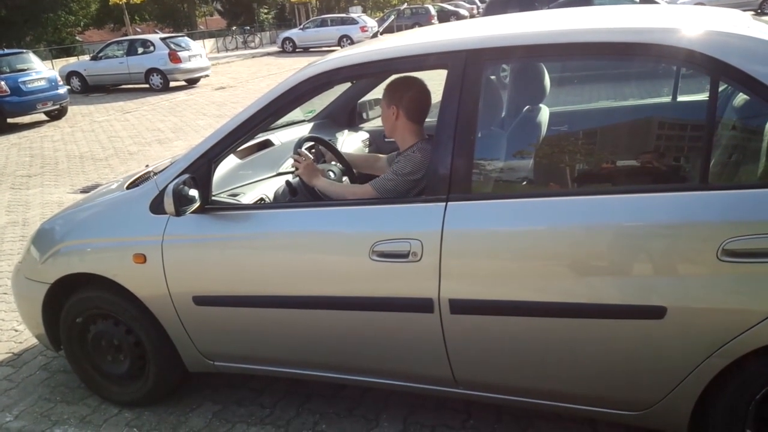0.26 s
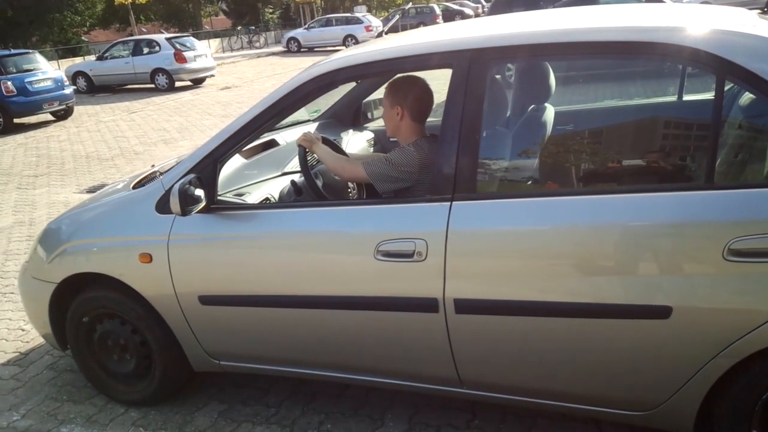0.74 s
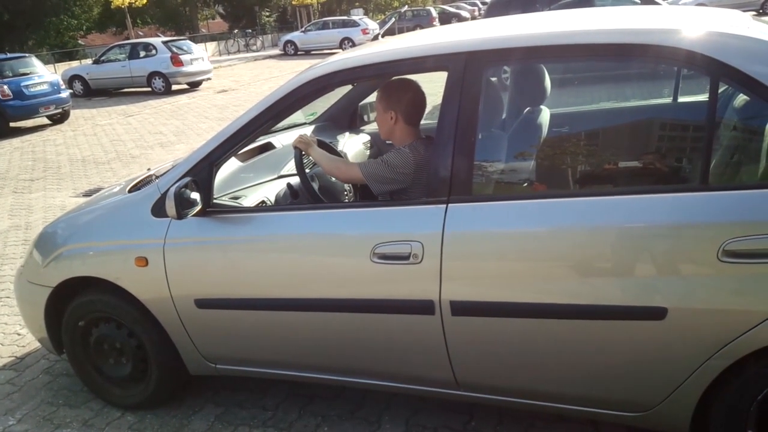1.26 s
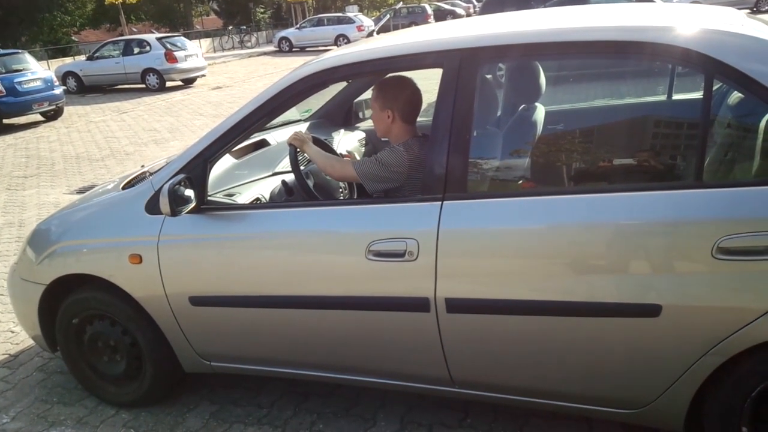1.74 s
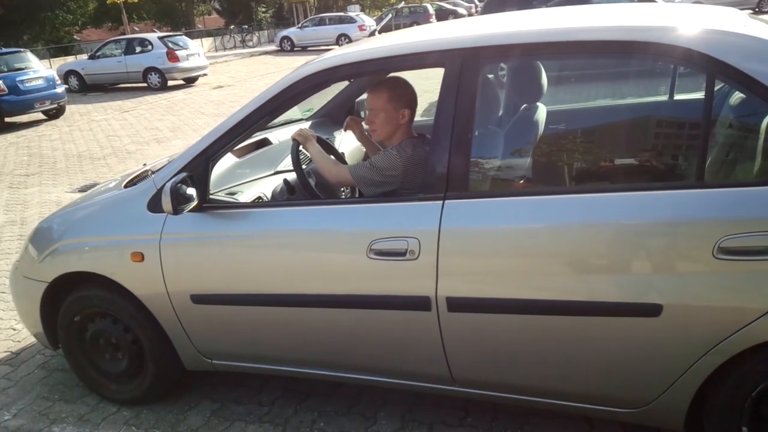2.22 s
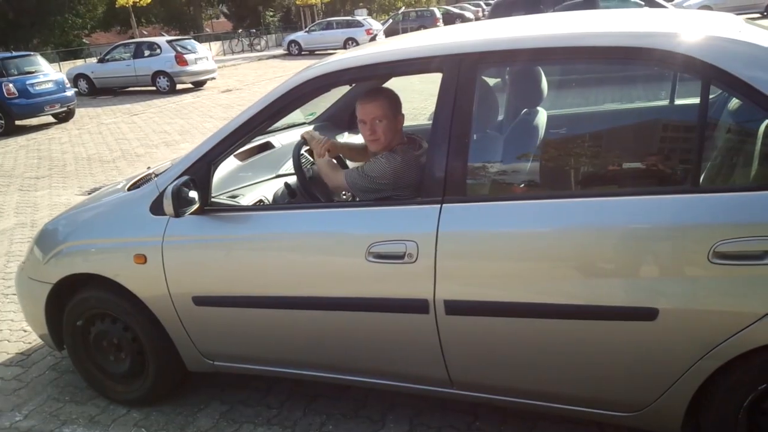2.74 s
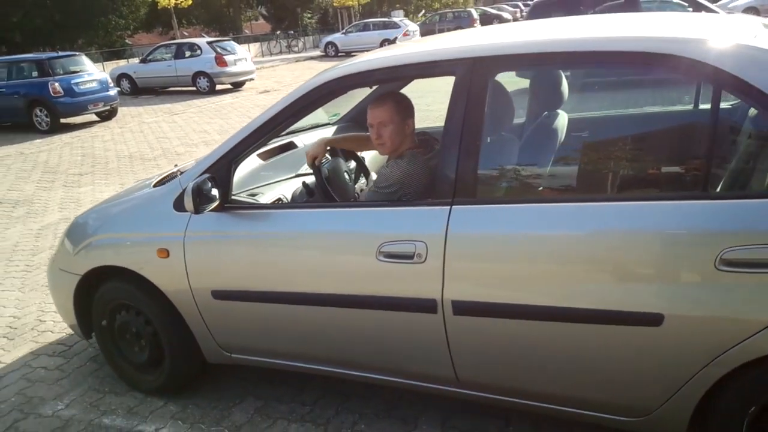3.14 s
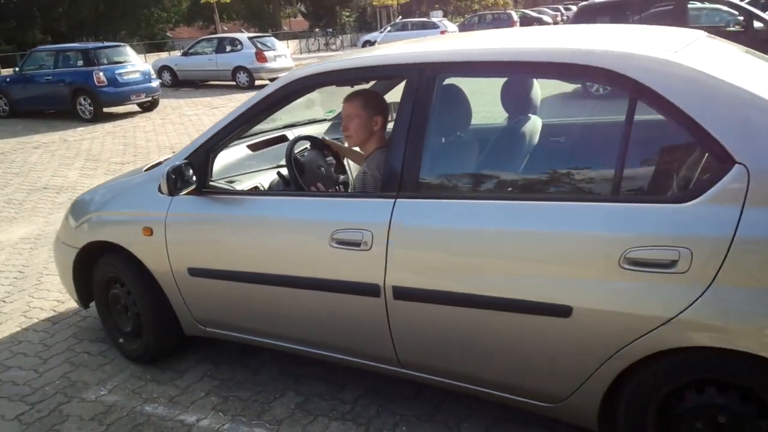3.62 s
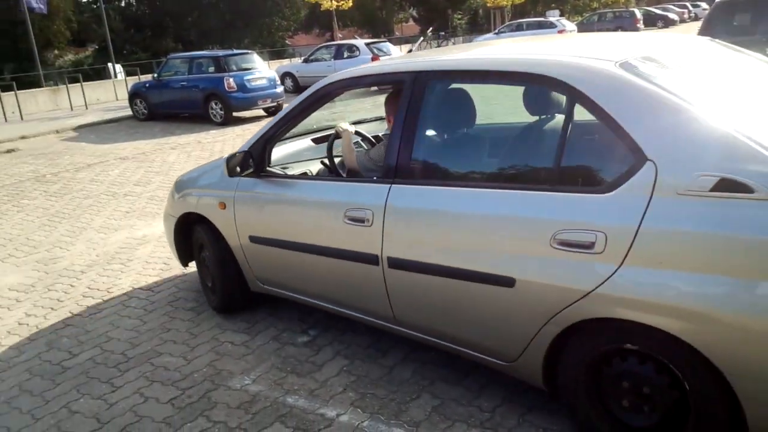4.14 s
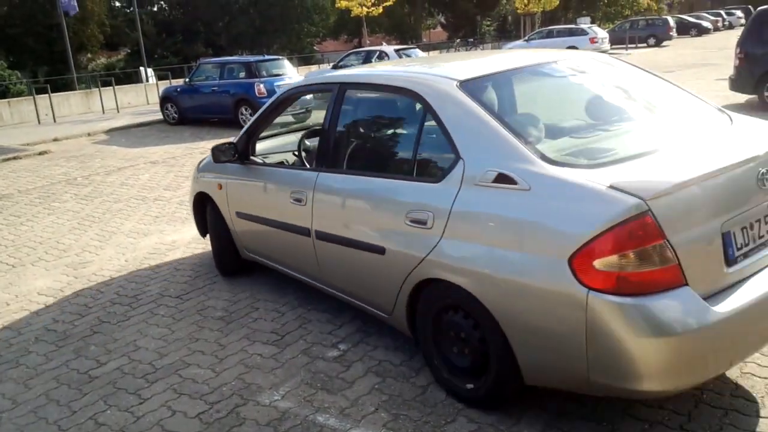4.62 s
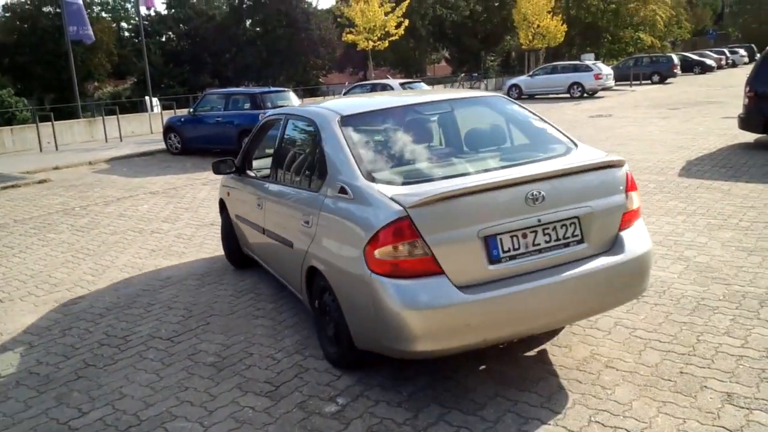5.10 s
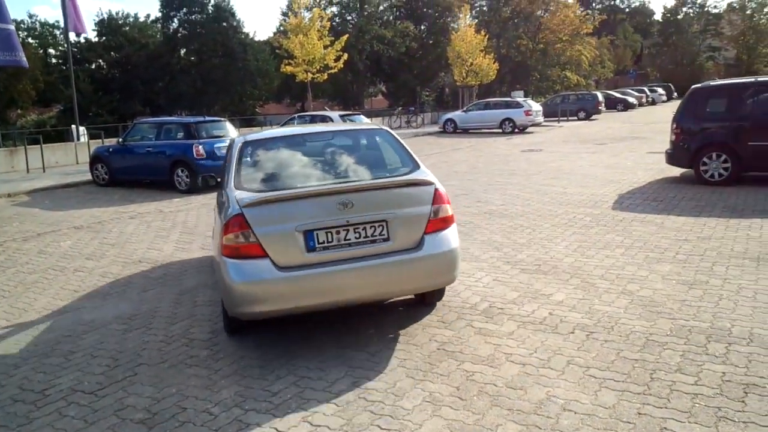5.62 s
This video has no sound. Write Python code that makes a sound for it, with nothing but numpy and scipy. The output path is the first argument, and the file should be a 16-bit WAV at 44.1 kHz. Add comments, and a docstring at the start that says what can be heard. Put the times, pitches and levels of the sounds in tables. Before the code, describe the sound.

A hybrid car clunks, whines faintly and creeps away, its tyres rumbling over paving stones and snapping grit.

```python
"""A paved car park, one microphone a couple of metres from a hybrid car that stands, then creeps off on
its electric motor. Levers and pedals clunk through the open window, the body rocks on its springs and
the inverter starts to whine. The tyres rumble over the paving stones and crush grit, which now and then
snaps. Distant traffic and leaves lie behind it all, and a light breeze touches the microphone."""
import sys
import numpy as np
from scipy import signal
from scipy.fft import rfft, irfft
from scipy.io import wavfile

SR = 44100
rng = np.random.default_rng(int(sys.argv[2]) if len(sys.argv) > 2 else 0)


def digitize_waveform(pressure):
    """Quantize a signal to 16-bit integers and store it at the path in sys.argv[1].

    Rows of a 2-D input are taken as channels; values are limited to [-1, 1].
    """
    field = np.atleast_2d(pressure).T
    bounded = np.clip(field, -1, 1)
    quanta = np.round(bounded * 32767).astype(np.int16)
    wavfile.write(sys.argv[1], SR, quanta)


N = 258426

# Tone colours as they reach the microphone. Each row: frequency in Hz, relative level in dB.
TOWN_SPECTRUM = [(30, 6.5), (100, 6), (200, 5), (320, 2.5), (500, -3), (1100, -4), (2000, -11), (3000, -13),
                 (4200, -15), (6300, -10.5), (8500, -18), (11000, -19), (14000, -19.5)]  # far traffic and leaves
RATTLE_SPECTRUM = [(2000, -28), (3000, -24.5), (3800, -9.5), (4700, -11.5), (5200, -4), (5900, -1),
                   (6550, -1), (8000, -4.5), (9500, -13), (11000, -28), (12700, -30), (13200, -12.5),
                   (13800, -31)]  # loose linkage
KNOCK_SPECTRUM = [(450, -11.5), (730, -3), (1100, -7), (1500, -1.5), (2150, -2), (2900, -11), (4500, -7)]  # a blow on a panel or the ground
THUD_SPECTRUM = [(40, -23), (120, 6.5), (220, -3.5), (350, -3), (460, -10), (700, -37.5)]  # the car's shell
CRUNCH_SPECTRUM = [(1500, -18), (2850, -17), (3600, -8), (4500, -4), (5000, -3.5), (5900, -1), (6600, 2),
                   (7400, -5.5), (9000, -14.5), (10900, -27), (12200, -29), (13400, -19.5), (14000, -47)]  # crushed grit
ROAR_SPECTRUM = [(350, -34), (490, -8.5), (680, -0.5), (1020, 0.5), (1250, -2.5), (1750, 3), (2200, -3),
                 (2850, -15), (4500, -42)]  # tread on paving
BOOM_SPECTRUM = [(30, -5), (55, 7), (90, 4), (155, 0.5), (205, 0.5), (260, 3), (320, 0), (375, -11.5),
                 (490, -27), (800, -21.5)]  # tyre carcass
CRACK_SPECTRUM = [(900, -49), (2800, -30.5), (4000, 8.5), (6500, 12.5), (8500, 3.5), (11000, 8.5),
                  (13500, -12), (15000, -70)]  # a stone giving way
# Breeze on the microphone. Each row: time in seconds, level in dB.
BREEZE_LEVELS = [(0, -51.5), (.6, -48), (1.6, -45), (2.8, -49.5), (4.3, -44.5), (5.86, -47.5)]
# Steel levers and their catches. Each row: start in seconds, rattle level in dB, body level in dB.
LEVER_PULLS = [(.189, -39.5, -40), (.246, -42, -46.5), (.701, -39, -51), (.713, -46, -47),
               (1.180, -12, -29), (1.232, -40, -35.5), (1.260, -26, -35.5), (1.382, -26.5, -32)]
# Dull knocks from the car, and three short tyre scrunches as it starts to roll (2.798 to 2.941 s).
# Each row: start in seconds, rattle level in dB, body level in dB, centre pitch in Hz.
KNOCKS_AND_SCRUNCHES = [(1.534, -42.5, -31, 830), (1.589, -39, -34, 990), (1.635, -43, -38.5, 2230),
                        (1.714, -52, -44, 1200), (2.631, -45, -45.5, 1400), (2.798, -50, -44, 1900),
                        (2.852, -48, -41, 1880), (2.941, -51, -40.5, 1900), (3.001, -38, -41, 1900),
                        (3.072, -34.5, -33.5, 2060), (3.120, -45, -34.5, 1400), (3.206, -33.5, -24.5, 1950),
                        (3.243, -55, -39.5, 790), (3.345, -35, -37.5, 1370), (3.403, -31.5, -32, 1430)]
# How panels and steel linkage ring. Each row: frequency in Hz, seconds to fall 60 dB, level in dB.
PANEL_MODES = [(737, 0.14, 6), (836, 0.087, 0), (1328, 0.028, 1), (1560, 0.028, -25), (1956, 0.13, -8.5),
               (2192, 0.15, -7)]
LINKAGE_MODES = [(5250, 0.099, 1), (6070, 0.017, 11.5), (6430, 0.038, 8), (6770, 0.061, -25),
                 (8500, 0.035, -27), (8200, 0.054, -2), (8240, .06, -12.5), (9700, 0.033, -11)]
# The car gathers pace. Each row: time in seconds, share of the final speed.
SPEED_CURVE = [(1.2, 0.0087), (1.65, 0.033), (2.65, 0.03), (3.0, 0.21), (3.65, .35), (4.0, .51),
               (4.45, 0.89), (5.101, 1.0)]
# Steered tyres grind sand on the spot. Each row: middle in seconds, half length in seconds, level in dB.
STEERING_SCRUBS = [(0.497, 0.32, -58), (3.193, 0.23, -44.5)]
# The body rocks on its springs. Each row: start in seconds, peak in dB, frequency in Hz.
BODY_THUMPS = [(1.222, -26, 58), (1.427, -27, 41.7), (1.684, -25.5, 52)]
# The inverter's switching tone. Each row: time in seconds, level in dB.
WHINE_LEVELS = [(1.67, -53), (2.27, -53.5), (2.41, -65), (2.66, -52.5), (2.74, -58), (3.1, -60), (3.9, -62),
                (4.4, -75)]
# The motor takes up the load in two pushes. Each row: start in seconds, end in seconds.
MOTOR_SURGES = [(3.17, 3.292), (3.3, 3.435)]
# Extra tones under load. Each row: multiple of a quarter of the switching rate, relative level in dB.
LOAD_TONES = [(5, -8), (6, 0), (8, -13), (10, -6)]
# Dry ticks close to the microphone. Each row: start in seconds, peak in dB, ring in Hz.
CLOSE_TICKS = [(1.766, -34, 5400), (1.8723, -33, 6200), (2.0435, -26, 7000), (2.0638, -18.5, 4740),
               (2.0843, -19, 8140)]
# The loudest stones under the tread. Each row: start in seconds, level in dB, ring in Hz, crumbs in dB.
STONE_SNAPS = [(3.0853, -21, 7100, -17), (3.1, -15, 7040, -12), (3.121, -13, 6670, -16.5),
               (3.3478, -18.5, 4900, -14), (3.3625, -12.5, 4620, -22), (3.4046, -9, 5240, -17.5),
               (3.5968, -19, 5780, -19), (3.651, -16, 7100, -29), (3.8532, -22, 4440, -7),
               (4.0214, -19, 4420, -14), (4.1608, -10.5, 5300, -15.5), (4.3915, -13.5, 6670, 1),
               (4.5093, -12.5, 5550, -18), (4.7923, -10.5, 6500, -12), (4.885, -19, 6440, -14),
               (5.1489, -1, 6050, -17.5), (5.152, -15, 6300, -23), (5.204, -11, 6040, -22),
               (5.3012, -5, 6930, -22), (5.3162, -14, 4700, -16), (5.4046, -6, 5820, -25),
               (5.4872, -14.5, 7500, -12), (5.7487, -13, 4700, -16)]

LEVER_T60_S, LEVER_HZ, LEVER_THUD_DB = 0.078, 2220, -3  # decay, panel pitch, thud against the body level
LEVER_RISE_S, RISE_DOUBLING_DB = 0.015, 37  # a harder pull takes longer: rise at 0 dB, dB that double it
DULL_T60_S, DULL_THUD_DB, DULL_RISE_S = 0.12, -17, .011  # knocks, scrunches and taps; rise at 1 kHz
TAPS_S, TAP_GAP_S, TAP_DB, TAP_FADE_DB, TAP_HZ = 2.286, .052, -45, 1.4, 1800  # light taps up front
PANEL_DB = -5.5  # ring of the panels against the body level
# Tyre sounds. Each pair: level at full speed in dB, dB gained per tenfold speed.
GRIT_LAW, ROAR_LAW, BOOM_LAW = (-35.5, 15.5), (-42, 27.4), (-44.5, 18.3)
LEAVES_S, LEAVE_DB_PER_S = 5.03, 2  # from here the car draws away from the microphone
LULL_S, LULL_WIDTH_S, LULL_DB = 5.61, 0.082, -3.5  # the tyre noise dips briefly
SWITCH_HZ, SURGE_DB, LOAD_TONES_DB, OCTAVE_DB = 5000, -47, -54, -61  # inverter
SMALL_SNAP_DB, SMALL_SNAP_SPREAD_DB, SMALL_SNAP_HZ = 3.5, 11.5, 6400  # level against the grit
STONE_T60_S, ARCH_HZ = .0035, 8870  # the wheel arches dull the snaps above this pitch
TOP_HZ, DC_OFFSET = 14000, -.094


def undb(db):
    """Decibels to gain."""
    return 10 ** (np.asarray(db) / 20)


def level_curve(table):
    """Rows of seconds and dB as a gain for every sample."""
    return undb(np.interp(np.arange(N) / SR, *np.transpose(table)))


def unit(x):
    """Scale to rms 1."""
    return x / np.sqrt(np.mean(x ** 2))


def decay(t, t60):
    """A fade that loses 60 dB in t60 seconds."""
    return np.exp(-np.log(1000) * t / t60)


def swell_and_fade(t, rise, t60):
    """Grow to 1 over rise seconds, then die away."""
    return np.minimum(t / rise, 1) ** 2 * decay(np.maximum(t - rise, 0), t60)


def bump(middle_s, width_s):
    """A smooth swell from 0 to 1 and back."""
    return np.exp(-((np.arange(N) / SR - middle_s) / width_s) ** 2)


def colour(x, points, size=4096):
    """Causal filter through (Hz, dB) points; keeps the power of white noise."""
    hz, db = np.transpose(points)
    bins = np.maximum(np.fft.rfftfreq(size, 1 / SR), 1)
    rolloff_db = 24 * np.maximum(np.log2(bins / hz[-1]), 0)
    cepstrum = irfft(np.log(undb(np.interp(np.log(bins), np.log(hz), db) - rolloff_db)))
    cepstrum[1:size // 2] *= 2  # fold to minimum phase
    cepstrum[size // 2 + 1:] = 0
    response = irfft(np.exp(rfft(cepstrum)))
    return signal.oaconvolve(x, response / np.linalg.norm(response))[:len(x)]


def ring(hz, t60):
    """Response of one mode, with energy 1; a small body radiates little below its pitch."""
    t = np.arange(SR // 4) / SR
    wave = np.diff(np.sin(2 * np.pi * hz * t) * decay(t, t60))
    return wave / np.linalg.norm(wave)


def walk(rate):
    """Smooth random drift that changes about rate times a second; rms 1."""
    steps = rng.standard_normal(N // 20)
    return unit(np.interp(np.arange(N) / SR * rate, np.arange(len(steps)), steps))


def grains(rate, spread_db):
    """Random impulses, most of them small and a few large; the same power at any rate."""
    chance, size = rng.random((2, N))
    rate, impulses = np.broadcast_to(rate, N), np.zeros(N)
    hit = np.flatnonzero(chance < rate / SR)
    signed = 2 * size[hit] - 1
    size_db = spread_db * np.minimum(-np.log(np.abs(signed)), 5)
    impulses[hit] = np.sign(signed) * undb(size_db) / np.sqrt(rate[hit])
    return unit(impulses)


def reflect(x, t60, wet_db):
    """Add the dense, short reflections between paving, wheel arches and cabin."""
    t = np.arange(SR // 2) / SR
    tail = rng.standard_normal(len(t)) * decay(t, t60)
    return x + undb(wet_db) * signal.oaconvolve(x, tail / np.linalg.norm(tail))[:N]


def add(track, s, sound):
    """Mix a sound into a track at s seconds."""
    start = int(s * SR)
    track[start:start + len(sound)] += sound[:max(N - start, 0)]


def outdoors():
    """Traffic and leaves far off, and gusts that rumble right on the microphone."""
    town = undb(-51.5) * colour(rng.standard_normal(N), TOWN_SPECTRUM) * undb(0.076 * walk(rate=2.6))
    gust_spectrum = [(8, -17), (20, 0), (38, 2.0), (60, -3.5), (100, -8.0), (170, -19), (400, -31)]
    gusts = colour(rng.standard_normal(N), gust_spectrum)
    return town + undb(3.5) * gusts * level_curve(BREEZE_LEVELS) * undb(3.1 * walk(rate=11))


def movements(tap_count=5):
    """Levers, knocks, tyre scrunches and fading taps: start, three levels, pitch, rise and decay."""
    for s, rattle_db, body_db in LEVER_PULLS:
        rise = LEVER_RISE_S * 2 ** (rattle_db / RISE_DOUBLING_DB)
        yield s, rattle_db, body_db, body_db + LEVER_THUD_DB, LEVER_HZ, rise, LEVER_T60_S
    taps = [(TAPS_S + k * TAP_GAP_S, TAP_DB - k * TAP_FADE_DB, TAP_DB - k * TAP_FADE_DB, TAP_HZ)
            for k in range(tap_count)]
    for s, rattle_db, body_db, hz in KNOCKS_AND_SCRUNCHES + taps:
        rise = DULL_RISE_S * (1000 / hz) ** 2  # softer contacts are lower and slower
        yield s, rattle_db, body_db, body_db + DULL_THUD_DB, hz, rise, DULL_T60_S


def clunks_and_scrunches():
    """Each is a burst of tiny impacts that swells and dies: a rattle, ringing panels and a thud."""
    t, power, panels = np.arange(SR // 3) / SR, np.zeros((3, N)), np.zeros(N)
    for s, rattle_db, body_db, thud_db, centre_hz, rise, t60 in movements():
        for track, db in zip(power, (rattle_db, body_db, thud_db)):
            add(track, s, (undb(db) * swell_and_fade(t, rise, t60)) ** 2)
        for hz, mode_t60, db in PANEL_MODES:
            # each burst favours the panel modes near its centre pitch
            weight = undb(body_db + PANEL_DB + db - 22.0 * abs(np.log2(hz / centre_hz)))
            detuned_hz = hz * (1 + 0.0016 * rng.standard_normal())
            mode = np.sin(2 * np.pi * (detuned_hz * t + rng.random()))
            add(panels, s, weight * swell_and_fade(t, rise, mode_t60) * mode)
    rattle, knock, thud = np.sqrt(power) * [grains(rate=14000, spread_db=3.5) for _ in power]
    steel = signal.oaconvolve(rattle, sum(undb(db) * ring(hz, t60) for hz, t60, db in LINKAGE_MODES))[:N]
    linkage = undb(-1.5) * colour(rattle, RATTLE_SPECTRUM) + undb(-21.5) * steel
    body = undb(-6.5) * colour(knock, KNOCK_SPECTRUM) + panels + colour(thud, THUD_SPECTRUM)
    return reflect(linkage + body, t60=0.22, wet_db=-11)


def road_speed():
    """Share of the final speed for every sample."""
    return np.clip(np.interp(np.arange(N) / SR, *np.transpose(SPEED_CURVE)), .001, 1.5)


def rolling(law):
    """Gain of a tyre sound: it grows with speed and falls as the car leaves the microphone."""
    full_db, slope_db = law
    away_s = np.maximum(np.arange(N) / SR - LEAVES_S, 0)
    return undb(full_db + slope_db * np.log10(road_speed()) - LEAVE_DB_PER_S * away_s)


def pings(rate, low_hz, high_hz, cycles, spread_db, count=10):
    """Stones of many sizes, each ringing briefly at its own pitch; rms 1."""
    return unit(sum(signal.oaconvolve(grains(rate / count, spread_db), ring(hz, cycles / hz)[:1024])[:N]
                    for hz in np.geomspace(low_hz, high_hz, count)))


def tyres():
    """Tread blocks crush grit and slap the paving; the load jolts unevenly over the stones."""
    speed, lull = road_speed(), undb(LULL_DB * bump(LULL_S, LULL_WIDTH_S))
    scrub = sum(undb(db) * bump(s, width) for s, width, db in STEERING_SCRUBS)
    jolt = walk(rate=38)
    sand = grains(rate=500 + 2600 * speed, spread_db=0) + undb(-4.5) * rng.standard_normal(N)
    chips = pings(rate=400, low_hz=4050, high_hz=8000, cycles=23, spread_db=4)
    grit_gain = lull * np.hypot(rolling(GRIT_LAW), scrub) * undb(0.64 * jolt + 2.43 * walk(rate=120))
    crunch = colour((sand + undb(-12.5) * chips) * grit_gain, CRUNCH_SPECTRUM)
    # creeping only grinds fine sand; the deeper crunch of coarse grit comes with speed
    coarse = signal.sosfiltfilt(signal.butter(4, 6200, fs=SR, output="sos"), crunch)
    crunch += 0.38 * (speed - .8) * coarse
    pebbles = pings(rate=260, low_hz=724, high_hz=2240, cycles=43, spread_db=0)
    tread = grains(rate=1200 + 2400 * speed, spread_db=3.5) + undb(-16.5) * pebbles
    slap = colour(tread * lull * rolling(ROAR_LAW) * undb(1.51 * jolt), ROAR_SPECTRUM)
    carcass = colour(rng.standard_normal(N) * rolling(BOOM_LAW) * undb(jolt), BOOM_SPECTRUM)
    return reflect(undb(-0.5) * crunch + slap + undb(4) * carcass, t60=0.057, wet_db=-10)


def thumps():
    """The whole shell swings for a cycle or two and pushes air at the microphone."""
    t, track = np.arange(SR // 4) / SR, np.zeros(N)
    for s, peak_db, hz in BODY_THUMPS:
        swell = t * hz / 0.52
        add(track, s, undb(peak_db) * (swell * np.exp(1 - swell)) ** 2 * np.sin(2 * np.pi * hz * t))
    return track


def inverter():
    """The motor windings sing at the switching rate; under load more tones join in."""
    t, ramp_s = np.arange(N) / SR, 0.013
    surge = sum(np.clip(np.minimum(t - start, end - t) / ramp_s, 0, 1) for start, end in MOTOR_SURGES)
    phase = 2 * np.pi * np.cumsum(SWITCH_HZ + (3.46 + 8 * surge) * walk(rate=64)) / SR
    whine = (level_curve(WHINE_LEVELS) + undb(SURGE_DB) * surge) * np.sin(phase)
    load = undb(LOAD_TONES_DB) * surge * sum(undb(db) * np.sin(k * phase / 4) for k, db in LOAD_TONES)
    octave = undb(OCTAVE_DB) * road_speed() * np.sin(2 * phase) * (t < WHINE_LEVELS[-1][0])
    switched_on, flicker = t > WHINE_LEVELS[0][0], undb(1.9 * walk(rate=36))
    return np.sqrt(2) * switched_on * (whine + load + octave) * flicker


def click(peak_db, hz, crumbs_db, knock_db):
    """Something hard gives way: a crack, a brief ring, a knock on the ground, falling crumbs."""
    t = np.arange(SR // 30) / SR
    push = undb(crumbs_db) * rng.standard_normal(len(t)) * np.exp(-t / 0.0026)
    push[SR // 1000] += 1  # the crack, after a millisecond of strain
    ringing = undb(4.5) * signal.fftconvolve(push, ring(hz, STONE_T60_S))[:len(t)]
    sound = colour(push, CRACK_SPECTRUM) + ringing + undb(knock_db) * colour(push, KNOCK_SPECTRUM)
    return undb(peak_db) * sound / np.abs(sound).max()


def ticks():
    """Small hard clicks, close enough to the microphone to stay dry."""
    track = np.zeros(N)
    for s, peak_db, hz in CLOSE_TICKS:
        add(track, s, click(peak_db, hz, crumbs_db=-48, knock_db=-9))
    return track


def snaps(small_count=18):
    """Stones crack under the car and echo off its floor; small ones come more often with speed."""
    stones = np.zeros(N)
    for s, db, hz, crumbs_db in STONE_SNAPS:
        add(stones, s, click(db, hz, crumbs_db, knock_db=-12))
    travelled, grit_gain = np.cumsum(road_speed()), rolling(GRIT_LAW)
    for k, (place, size, pitch) in enumerate(rng.random((small_count, 3))):
        sample = np.searchsorted(travelled, travelled[-1] * (k + place) / small_count)
        db = SMALL_SNAP_DB + SMALL_SNAP_SPREAD_DB * (2 * size - 1)
        hz = SMALL_SNAP_HZ * 2 ** (.7 * (pitch - .5))
        add(stones, sample / SR, grit_gain[sample] * click(db, hz, crumbs_db=-12, knock_db=-4.5))
    muffled = signal.sosfilt(signal.butter(3, ARCH_HZ, fs=SR, output="sos"), stones)
    return reflect(muffled, t60=0.054, wet_db=-6.5)


def scene():
    """The car park at one microphone, a couple of metres from the car."""
    return (outdoors() + clunks_and_scrunches() + tyres() + thumps() + inverter() + ticks() + snaps())[None]


def record(dry):
    """The recorder cuts the top, and its converter sits a little off zero."""
    return signal.sosfilt(signal.ellip(8, .2, 70, TOP_HZ, fs=SR, output="sos"), dry) + DC_OFFSET


dry = scene()
out = record(dry)
digitize_waveform(out)
```